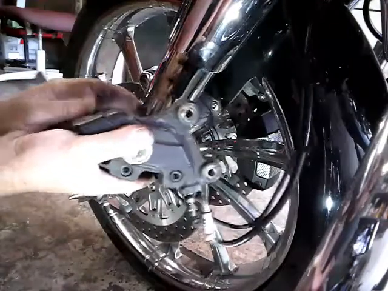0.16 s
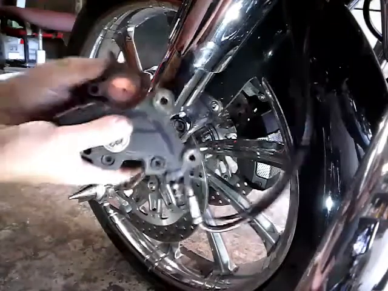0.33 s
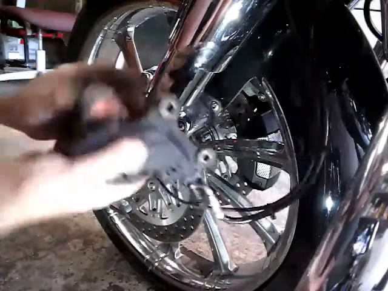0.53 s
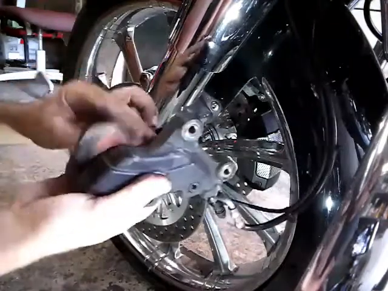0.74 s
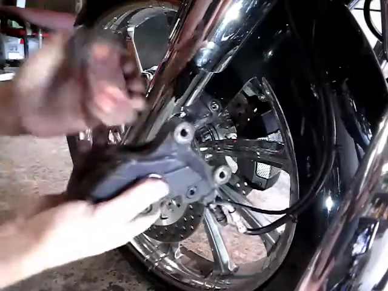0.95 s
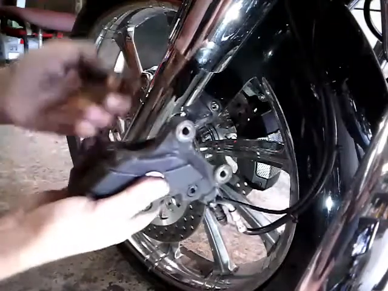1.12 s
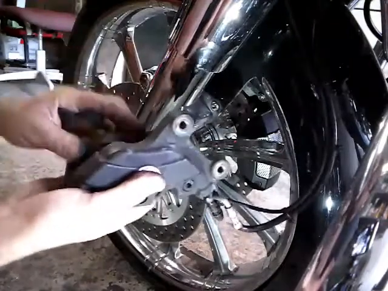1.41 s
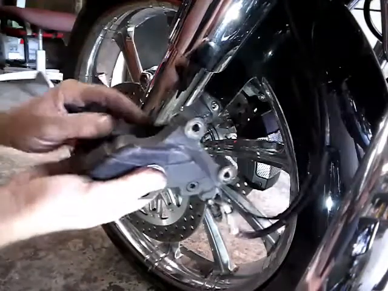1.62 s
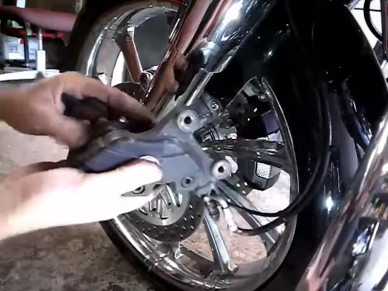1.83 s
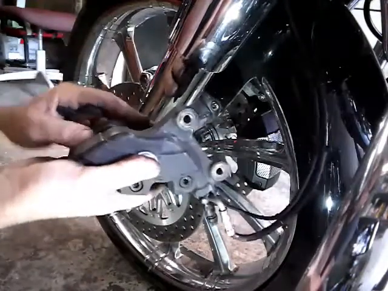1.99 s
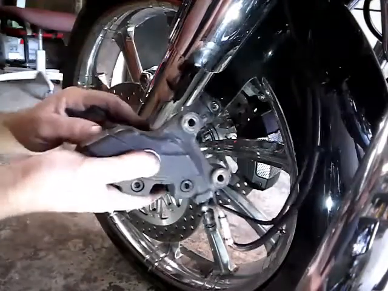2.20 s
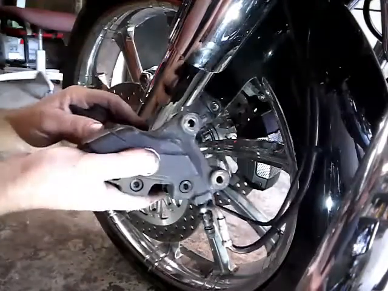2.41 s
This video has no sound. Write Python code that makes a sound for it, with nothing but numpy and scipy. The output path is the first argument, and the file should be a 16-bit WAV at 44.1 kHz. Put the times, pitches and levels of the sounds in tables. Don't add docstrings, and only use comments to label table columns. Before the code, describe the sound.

A hard metallic clunk, a quick clinking rattle of loose steel pads, then sparse faint ticks

```python
import sys
import numpy as np
from scipy import signal
from scipy.fft import rfft, irfft
from scipy.io import wavfile
from scipy.ndimage import uniform_filter1d

SR = 44100
rng = np.random.default_rng(int(sys.argv[2]) if len(sys.argv) > 2 else 0)


def amplitude_ratio(level_db):
    exponent = np.asarray(level_db, float) / 20
    return 10 ** exponent


def master(y):
    cut = np.clip(np.atleast_2d(y).T, -1, 1)
    pcm = np.round(cut * 32767)
    wavfile.write(sys.argv[1], SR, pcm.astype(np.int16))


N = 112454
CONTACT_S, CLACK_T60_S = .0005, .02

# frequency in Hz, density in dB per Hz.
CLACK = [(250, -34), (600, -14), (1200, -5), (2000, 0), (5000, 0), (8300, -7), (9800, -24), (15500, -32)]
# frequency in Hz, side relative to mid in dB.
SIDE_DB = [(40, -30.5), (100, -19.5), (400, -4.5), (3000, 2), (15000, -1)]


def curve(table, hz):
    points = np.array(table, float)
    return amplitude_ratio(np.interp(np.log(hz + 1), np.log(points[:, 0]), points[:, 1]))


def colour(x, gain):
    return irfft(rfft(x) * gain(np.arange(N // 2 + 1) * SR / N), N)


def unit(x):
    return x / np.sqrt(np.mean(x ** 2))


def walk(rate):
    hold = int(SR / rate)
    steps = np.repeat(rng.standard_normal(N // hold + 1), hold)
    return unit(uniform_filter1d(uniform_filter1d(steps, hold), hold)[:N])


def spread(mid, side):
    side = colour(side, lambda f: curve(SIDE_DB, f))
    return np.array([mid + side, mid - side])


def diffuse_noise(gain):
    mid, side = (unit(colour(rng.standard_normal(N), gain)) for _ in range(2))
    return spread(mid, side)


def strikes(times, gains):
    x = np.zeros(N)
    np.add.at(x, np.minimum((np.asarray(times) * SR).astype(int), N - 1), gains)
    return x


def favour(hz, centre_hz):
    return np.maximum(-5 * np.log2((hz + 1) / centre_hz) ** 2, -14)


def ring(modes, times, db, centre_hz=None):
    # frequency in Hz, left over right in dB, left lead in radians.
    ports = np.array([(950, 3, 0), (1580, 0, -.35), (1830, -5, -.5), (2137, 0, .35), (2336, -4, .5),
                      (3200, 0, .3), (4400, 6, 1.1), (7500, 1, -1.5)]).T
    out, side = np.zeros((2, N)), np.array([[.5], [-.5]])
    push = np.hanning(int(CONTACT_S * SR) + 4)
    push /= push.sum()
    for hz, mode_db, t60 in modes:
        pole = np.exp(2j * np.pi * hz / SR - np.log(1000) / (max(t60, .004) * SR))
        favour_db = 0 if centre_hz is None else favour(hz, centre_hz)
        x = strikes(times, amplitude_ratio(db + mode_db + favour_db)) + 1e-18
        if centre_hz is None:
            x = x * np.exp(2j * np.pi * hz / SR * np.arange(N))
        z = signal.lfilter(push * pole ** np.arange(len(push)), [1, -pole], x)
        gain = amplitude_ratio(side * np.interp(hz, ports[0], ports[1]))
        turn = np.exp(1j * side * np.interp(hz, ports[0], ports[2]))
        out += (z * turn * gain).imag
    return out


def families(blows, *groups):
    s, *db = np.array(blows).T
    return sum(ring(modes, s, d) for modes, d in zip(groups, db))


def clack(times, db, centre_hz, t60, table=CLACK):
    out, size = np.zeros((2, N)), 8192
    t, f = np.arange(size) / SR, np.arange(size // 2 + 1) * SR / size
    env = amplitude_ratio(-60 * t / t60) * np.clip(t / CONTACT_S, 0, 1)
    width = np.array([f ** 0, amplitude_ratio(-1.5) * curve(SIDE_DB, f)])
    for start, level_db, hz in zip((times * SR).astype(int), db, centre_hz + 0 * db):
        shape = curve(table, f) * amplitude_ratio(favour(f, hz)) * width
        noise = irfft(rfft(rng.standard_normal((2, size))) * shape)
        mid, side = noise / np.sqrt(np.mean(shape[0] ** 2))
        burst = amplitude_ratio(level_db) * env * np.array([mid + side, mid - side])
        out[:, start:start + size] += burst[:, :N - start]
    return out


def knock(hits, modes, t60):
    s, db, clack_db, centre_hz = np.array(hits).T
    return ring(modes, s, db, centre_hz) + clack(s, clack_db, centre_hz, t60)


def clunk():
    # start in seconds, level in dB, clack in dB, favoured pitch in Hz.
    hits = [(.2012, -45, -39.5, 1994), (.2062, -30.5, -31.5, 1700), (.2080, -13, -18.5, 2200),
            (.2100, -26, -23, 2822), (.2116, -15.5, -18.5, 5113), (.2145, -24.5, -23.5, 1590),
            (.2190, -32, -33.5, 3990), (.2230, -22.5, -27.5, 1610), (.2320, -31, -31, 2320),
            (.2400, -24, -25, 1496), (.2520, -42, -35, 2997)]
    # frequency in Hz, level in dB, T60 in seconds.
    modes = [(1445, -5, .035), (1560, 1, .033), (1866, -4, .035), (2245, -9, .03), (2706, -8, .035),
             (3030, -12, .05), (3510, -5, .025), (3585, 0, .028), (4300, -11, .04), (4482, -8, .035),
             (5850, -10, .022), (6070, -7, .022), (7450, -11, .025)]
    return knock(hits, modes, .045)


def spray():
    # start in seconds, level in dB.
    blows = [
        (.2090, -43.5),
        (.2240, -55),
        (.2400, -55.5),
    ]
    # frequency in Hz, density in dB per Hz.
    grit = [(5000, -24.5), (8500, -1), (10500, -6.5), (14800, -4.5), (15500, -12.5)]
    return clack(*np.array(blows).T, 11000, .09, grit)


def casting():
    # start in seconds, then dull modes, wall, bridge and clack in dB.
    knocks = [(0.4369, -56, -34, -49, -37), (0.4450, -26.5, -23, -43, -40), (0.4897, -56, -48, -29, -28),
              (0.4914, -34.5, -22, -48, -66), (0.4995, -66, -62, -28, -37), (0.5065, -60, -64, -43, -33.5),
              (0.5302, -47, -43, -32, -22.5), (0.5360, -32.5, -19, -33, -21),
              (0.5375, -61, -43, -24.5, -45), (0.5453, -70, -39.5, -43, -32), (0.554, -42, -63, -41, -29),
              (0.603, -53, -45, -61, -42.5), (0.6777, -45.5, -53, -51, -38),
              (.6830, -38.5, -67, -28, -28.5), (0.689, -62, -54, -60, -31.5), (0.779, -47, -41, -63, -64),
              (0.7975, -29.5, -16, -43, -37), (0.8016, -30, -55, -27.5, -30.5), (0.809, -60, -63, -49, -40),
              (0.8985, -52, -50, -64, -40.5), (0.9032, -43.5, -44, -41, -47)]
    # start in seconds, level in dB.
    thuds = [(.2080, -36.5), (.2400, -43), (.4448, -45), (.4905, -47), (.5360, -33.5), (.5530, -37),
             (.5650, -48), (.6830, -54), (.7975, -41.5), (.9030, -55), (2.0125, -53)]
    # frequency in Hz, level in dB, T60 in seconds.
    dull = [(1340, -10, .025), (1590, 0, .025), (1830, -2, .025)]
    wall = [(2085, -6, .025), (2137, -2, .045)]
    bridge = [(3603, 2.5, 0.022), (4100, -26, 0.11), (4290, -11, 0.03)]
    whole = [(430, -8, .03), (660, -6, .03), (920, 0, .035), (1040, -8, .08)]
    s, dull_db, wall_db, bridge_db, clack_db = np.array(knocks).T
    body = ring(dull, s, dull_db) + ring(bridge, s, bridge_db) + families(thuds, whole)
    return body + clack(s, clack_db, 2800, CLACK_T60_S), ring(wall, s, wall_db)


def pad_plate():
    # start in seconds, then first bend, second bend, twisting and edge in dB.
    blows = [(.4372, -39, -54, -62, -49), (0.4520, -60, -60, -70, -56), (.4650, -70, -69, -75, -60),
             (.4896, -43, -52, -38, -50), (0.496, -40, -54, -46, -64), (0.5022, -33.5, -34, -44, -66),
             (0.5067, -47, -37, -35.5, -70), (0.5312, -57, -39, -30, -44), (0.5372, -47, -32, -39, -49),
             (0.5415, -30, -24, -51, -42), (.5470, -54, -38, -56, -60), (.5600, -57, -50.5, -63, -59),
             (0.603, -49, -48, -74, -74), (.625, -70, -60, -72, -80), (.645, -68, -69, -59, -69),
             (0.653, -60, -69, -54, -77), (.665, -64, -72, -63, -77), (0.6825, -38, -37, -32, -35.5),
             (.6855, -53, -42, -53, -53), (.730, -55, -70, -61, -70), (.755, -70, -70, -69, -80),
             (.785, -68, -59, -64, -80), (.7950, -64, -54, -46, -62), (0.7982, -32, -37, -66, -69),
             (0.8005, -62, -35.5, -69, -43.5), (0.817, -52, -54, -87, -80),
             (0.9035, -36.5, -37.5, -62, -54), (1.004, -66, -76, -75, -62),
             (1.0450, -57, -82, -64.5, -69.5), (1.075, -60, -82, -68, -80), (1.145, -58, -74, -74, -80),
             (1.239, -54, -75, -81.5, -69.5)]
    # frequency in Hz, level in dB, T60 in seconds.
    bending = [(2336, 0, .09), (2295, -8, .04)]
    bending_2 = [(3215, 0, .08), (3260, -10, .03)]
    twisting = [(5930, 0, .1)]
    edge = [(7515, 0, .065), (8160, -8, .04)]
    return families(blows, bending, bending_2, twisting, edge)


def pad_ear():
    # start in seconds, level in dB.
    blows = [
        (.6826, -24),
        (.6858, -32),
    ]
    # frequency in Hz, level in dB, T60 in seconds.
    modes = [(1500, -12, .025), (2966, -8, .04), (3300, 0, .035), (3634, -6, .045)]
    return families(blows, modes)


def shim():
    # start in seconds, then low, middle and top modes in dB.
    blows = [(.2095, -37, -48.5, -42), (.2125, -43.5, -55.5, -42), (.2235, -58.5, -58, -56),
             (.4375, -72, -68, -70), (.4895, -71, -61, -64), (.5000, -66, -70, -66), (.5310, -70, -56, -62),
             (.5365, -62, -58, -60), (.5530, -41, -48.5, -58), (.6830, -68, -68, -66),
             (.7985, -57, -64, -66), (.8020, -60, -63, -62), (.9000, -64, -68, -56)]
    # frequency in Hz, level in dB, T60 in seconds.
    low = [(8860, -1, .03), (9884, 0, .035)]
    middle = [(11560, 0, .05), (12230, -4, .025)]
    top = [(13080, -8, .03), (13600, -3, .03), (14520, 0, .04)]
    return families(blows, low, middle, top)


def pin():
    # start in seconds, level in dB.
    blows = [
        (.5365, -41),
        (0.8005, -38.5),
        (.9036, -56),
    ]
    # frequency in Hz, level in dB, T60 in seconds.
    modes = [(1800, -6, .04), (1820, -13, .2), (5062, 0, .045), (5078, -6, .16)]
    return families(blows, modes)


def clip():
    # start in seconds, level in dB, clack in dB, favoured pitch in Hz.
    ticks = [
        (2.0122, -63, -50.5, 1600),
        (2.0165, -75, -62.5, 3000),
        (2.2222, -45, -59, 3230),
        (2.2750, -47, -48, 2340),
        (2.5445, -45, -50, 2860),
    ]
    # frequency in Hz, level in dB, T60 in seconds.
    modes = [(1700, 0, 0.026), (2093, 7.5, 0.022), (3032, -10.5, 0.052), (4476, -11.5, 0.023),
             (5600, -3, 0.031)]
    return knock(ticks, modes, CLACK_T60_S)


def tongue():
    # start in seconds, level in dB.
    blows = [
        (.138, -66),
        (.150, -64),
        (.160, -69.5),
        (2.2225, -51.5),
        (2.5445, -50.5),
    ]
    # frequency in Hz, level in dB, T60 in seconds.
    modes = [(4460, 0, .1)]
    return families(blows, modes)


def rub():
    # time in seconds, level in dB.
    slide = [(0, -79), (0.168, -70.5), (.180, -56.5), (.187, -51.5), (0.196, -54.5), (0.207, -45),
             (.23, -54), (1.401, -83), (1.6, -71.5), (1.64, -66), (1.67, -75), (1.72, -69.5), (1.78, -82.5),
             (1.81, -68.5), (1.86, -71.5), (1.95, -79.5), (2.029, -77), (2.1, -81), (2.55, -78.5)]
    centre_hz, width_hz, grain_db = 3200, 2600, 3
    band = lambda f: 1 / (1 + ((f - centre_hz ** 2 / (f + 1)) / width_hz) ** 2)
    db = np.interp(np.arange(N) / SR, *np.array(slide).T) + grain_db * walk(100)
    return amplitude_ratio(db) * diffuse_noise(band)


def room(x):
    low_t60_s, high_t60_s, split_hz, gap_s = .25, .24, 3600, .011
    t = np.arange(SR // 2) / SR
    noise = rng.standard_normal((3, len(t)))
    noise = noise[0] + 0.87 * noise[1:]
    low = signal.lfilter(*signal.butter(1, split_hz, fs=SR), noise)
    tail = low * amplitude_ratio(-60 * t / low_t60_s) + (noise - low) * amplitude_ratio(-60 * t / high_t60_s)
    tail *= np.clip(t / gap_s, 0, 1) ** 2
    tail /= np.sqrt(np.sum(tail ** 2, axis=1, keepdims=True))
    return amplitude_ratio(-12.5) * signal.fftconvolve(x.mean(axis=0, keepdims=True), tail, axes=1)[:, :N]


def machine_hum():
    # frequency in Hz, level in dB rms.
    lines = [(75.4, -57.5), (113.0, -56), (285.3, -70), (360.7, -72)]
    wobble_db, drift = 3.5, .02
    out = np.zeros(N)
    for hz, db in lines:
        level = np.sqrt(2) * amplitude_ratio(db + wobble_db * walk(5.5))
        phase = 2 * np.pi * np.cumsum(hz * (1 + drift * walk(1.9))) / SR
        out += level * np.sin(phase)
    return out


def ambience(table, db, lo_hz, hi_hz):
    def gain(f):
        return curve(table, f) / np.sqrt((1 + (lo_hz / (f + 1)) ** 8) * (1 + (f / hi_hz) ** 8))
    return amplitude_ratio(db + .5 * walk(2)) * diffuse_noise(gain)


def garage():
    # frequency in Hz, density in dB per Hz.
    rumble = [(25, -26.5), (40, -8), (50, -13.5), (65, -2.5), (112, -3), (139, -5.5), (357, -15.5),
              (600, -20.5)]
    hiss = [(400, 1.5), (650, 4.5), (1200, 1.5), (2500, -5), (4000, -15), (6500, -20.5), (10000, -22),
            (15500, -21.5)]
    return machine_hum() + ambience(rumble, -50.5, 20, 500) + ambience(hiss, -61.5, 500, 16000)


def scene():
    body, wall = casting()
    knocks = clunk() + spray() + body + clip()
    plate = pad_plate() + shim() + pin() + pad_ear() + tongue() + wall
    work = knocks + plate + room(knocks + amplitude_ratio(-7) * plate)
    no_bass = signal.butter(2, 330, "high", fs=SR, output="sos")
    return signal.sosfilt(no_bass, work) + rub() + garage()


def roll_off(x):
    return signal.sosfilt(signal.butter(12, 15640, fs=SR, output="sos"), x)


def record(dry):
    low_pass = signal.ellip(8, .2, 50, 15550, fs=SR, output="sos")
    return roll_off(signal.sosfiltfilt(low_pass, dry))


dry = scene()
out = record(dry)
master(out)
```